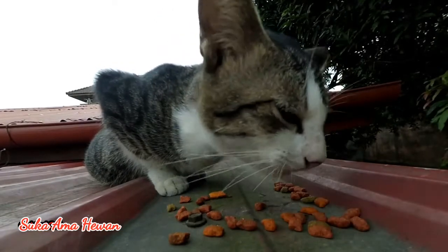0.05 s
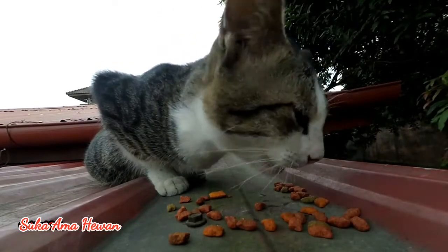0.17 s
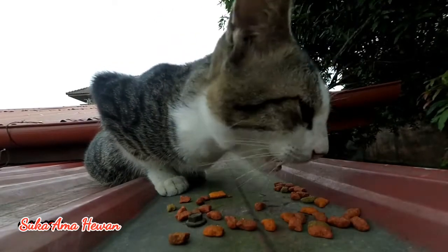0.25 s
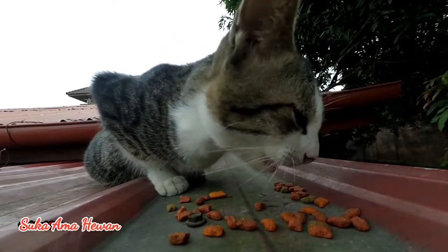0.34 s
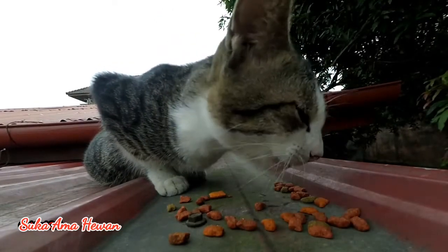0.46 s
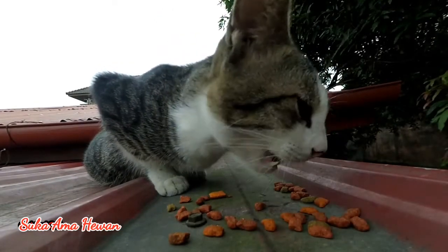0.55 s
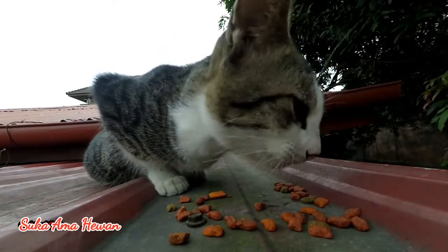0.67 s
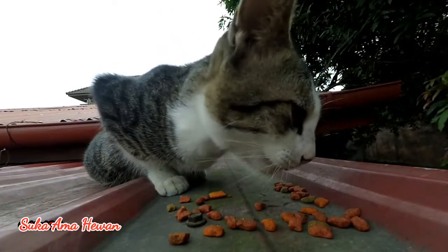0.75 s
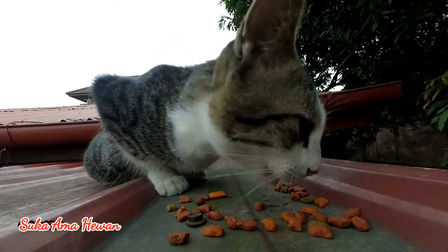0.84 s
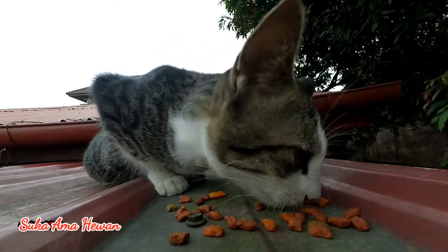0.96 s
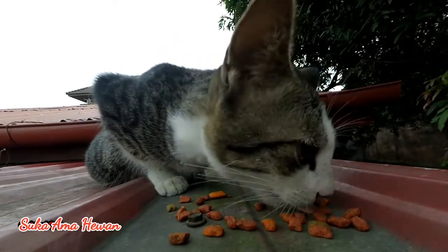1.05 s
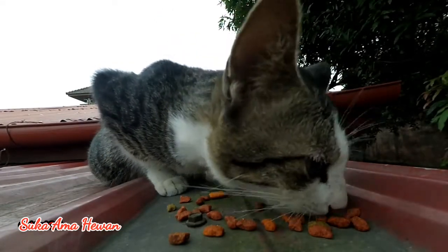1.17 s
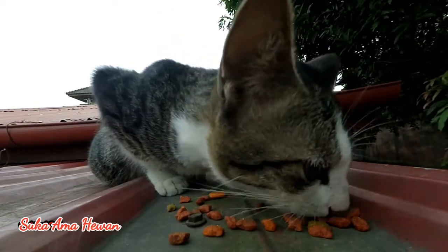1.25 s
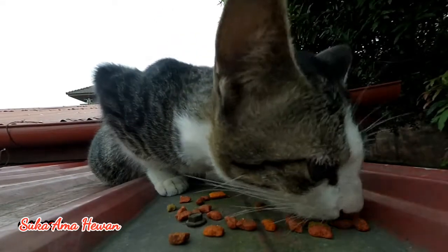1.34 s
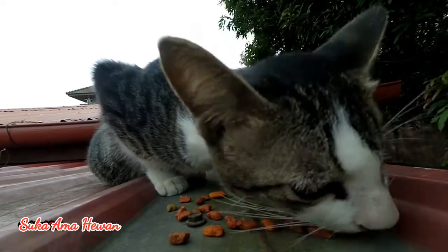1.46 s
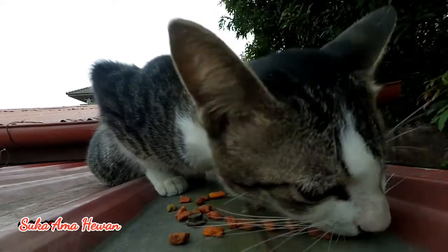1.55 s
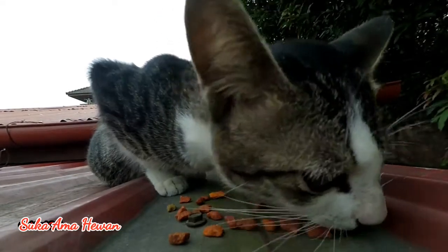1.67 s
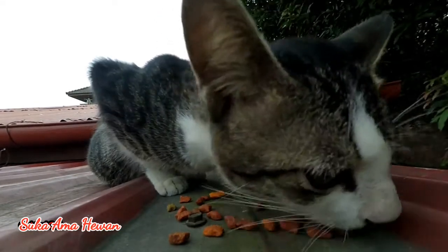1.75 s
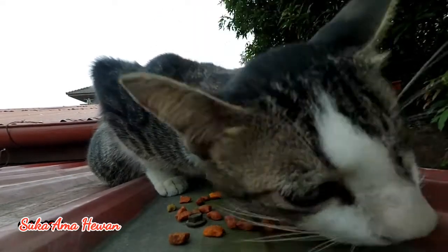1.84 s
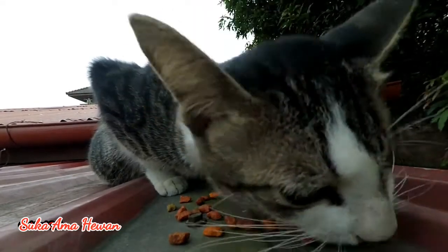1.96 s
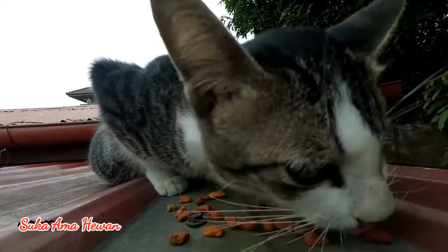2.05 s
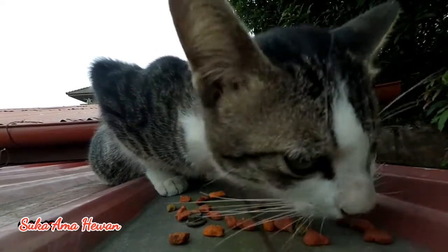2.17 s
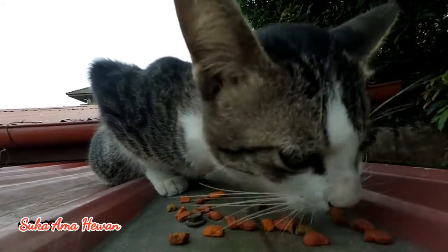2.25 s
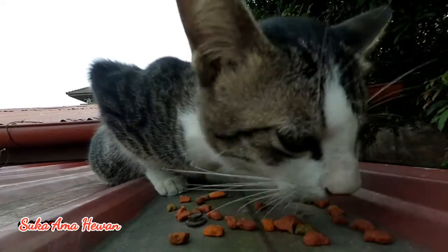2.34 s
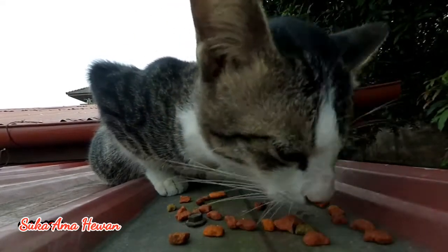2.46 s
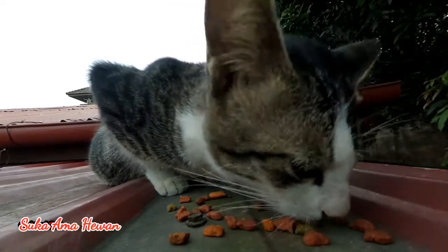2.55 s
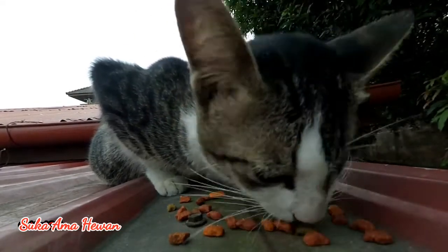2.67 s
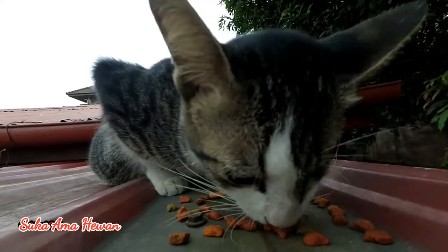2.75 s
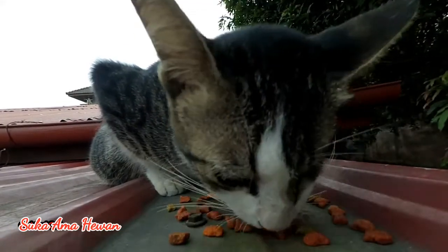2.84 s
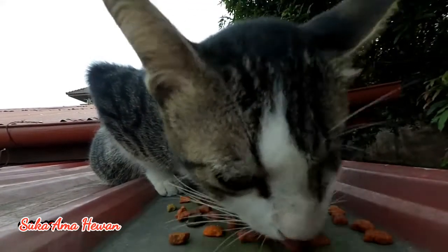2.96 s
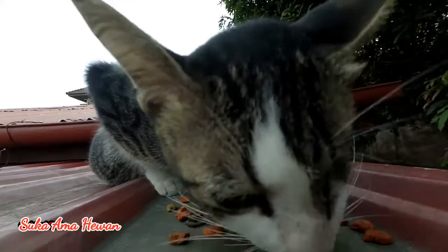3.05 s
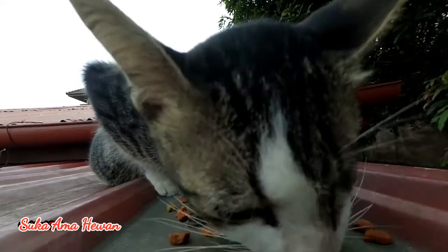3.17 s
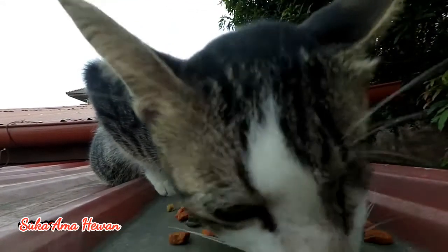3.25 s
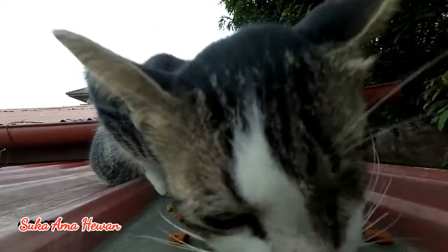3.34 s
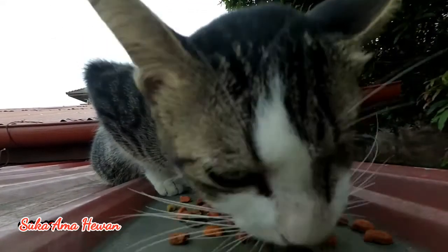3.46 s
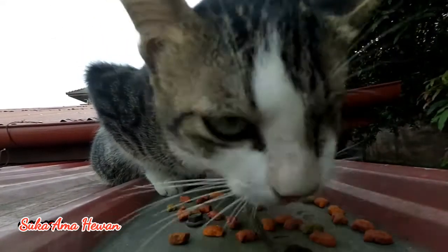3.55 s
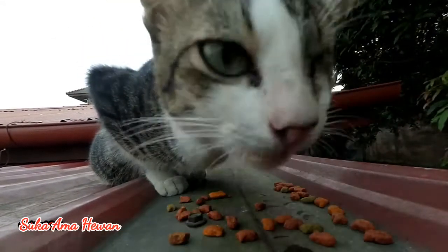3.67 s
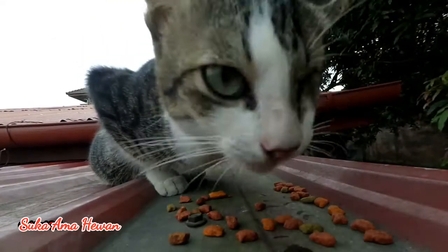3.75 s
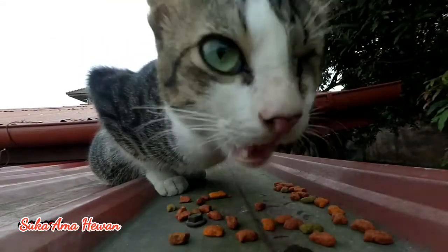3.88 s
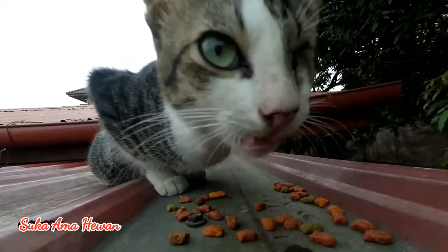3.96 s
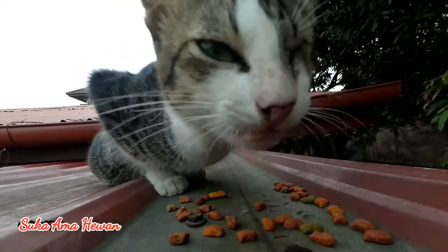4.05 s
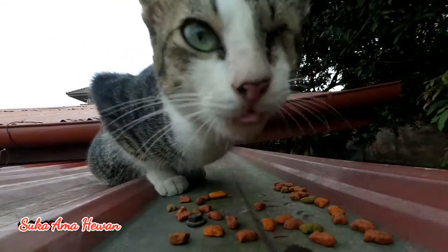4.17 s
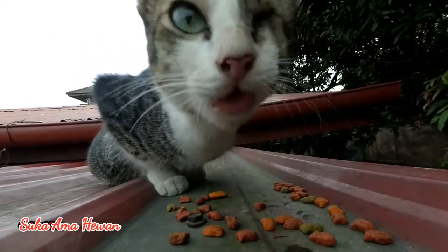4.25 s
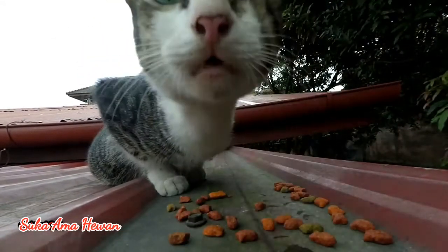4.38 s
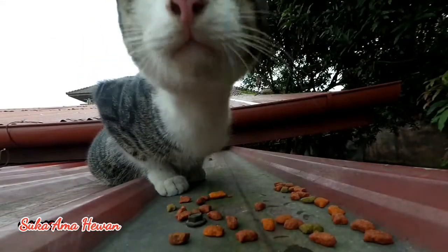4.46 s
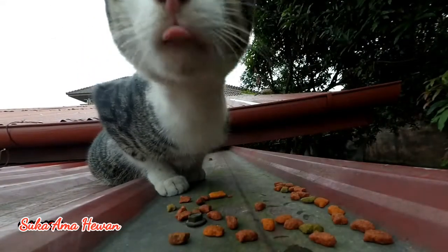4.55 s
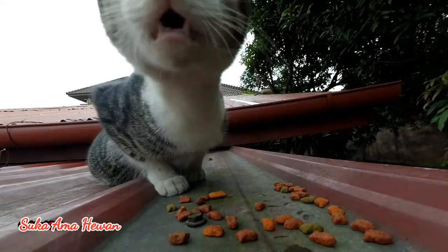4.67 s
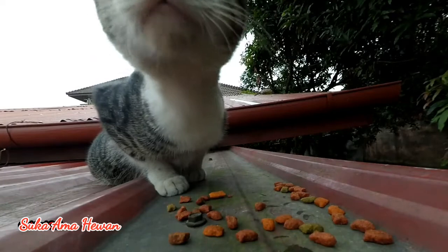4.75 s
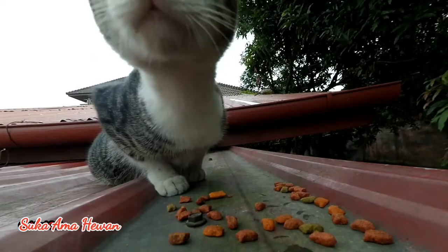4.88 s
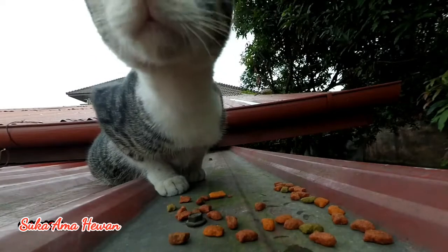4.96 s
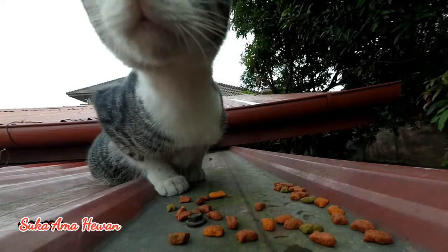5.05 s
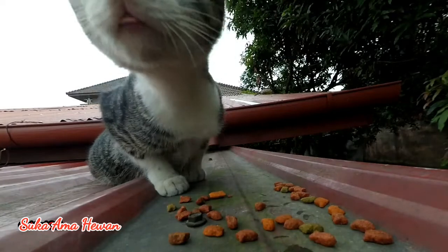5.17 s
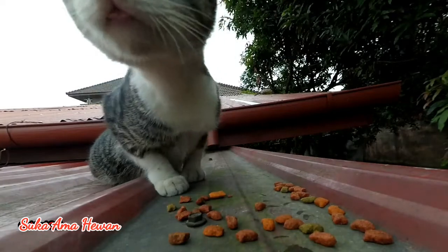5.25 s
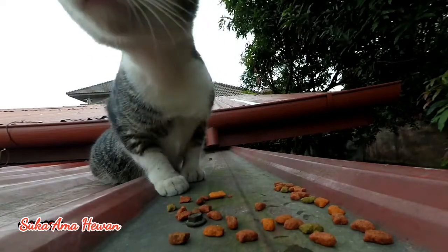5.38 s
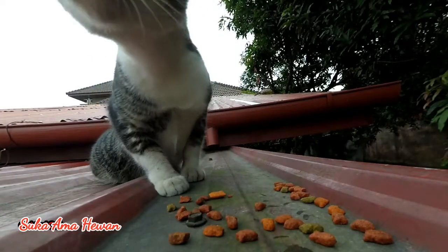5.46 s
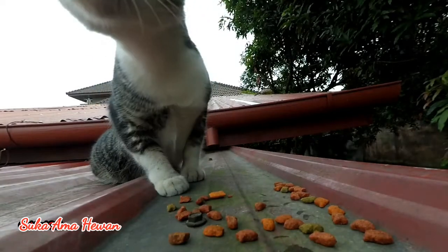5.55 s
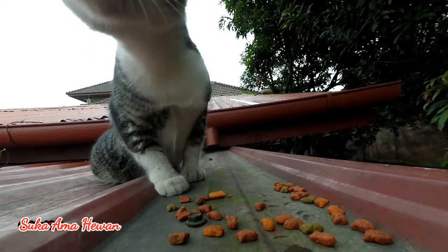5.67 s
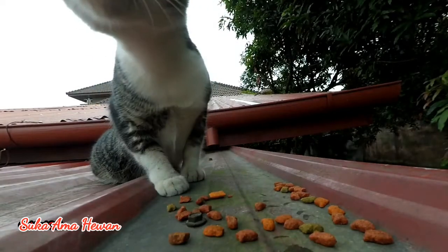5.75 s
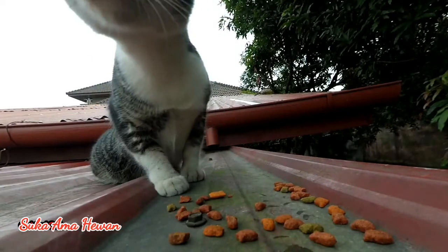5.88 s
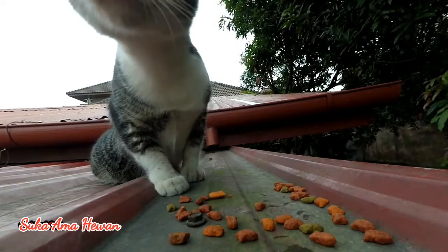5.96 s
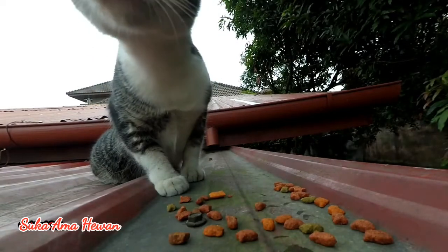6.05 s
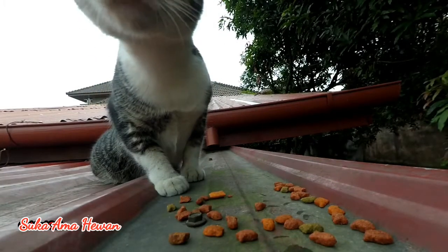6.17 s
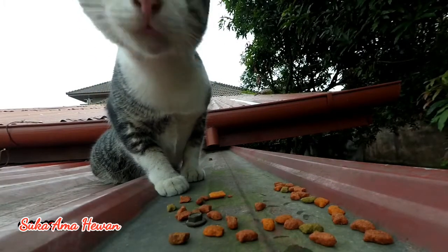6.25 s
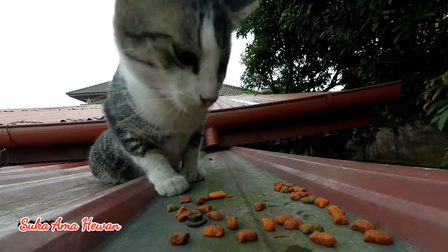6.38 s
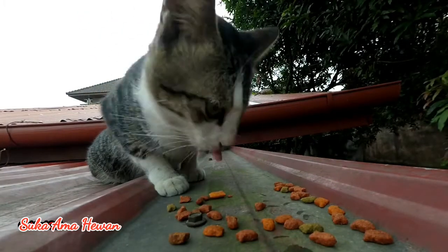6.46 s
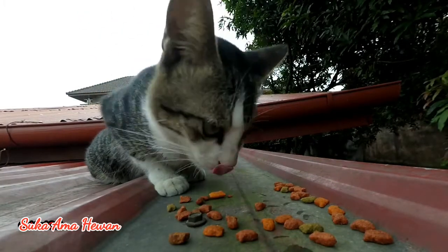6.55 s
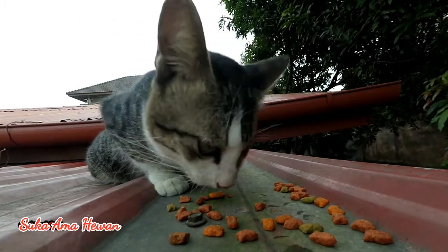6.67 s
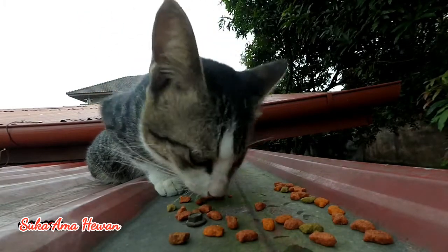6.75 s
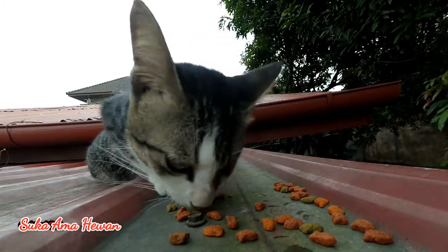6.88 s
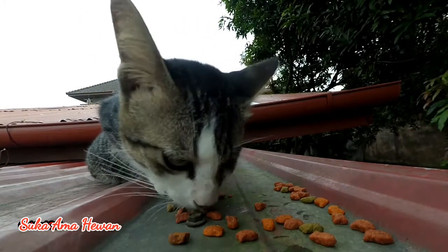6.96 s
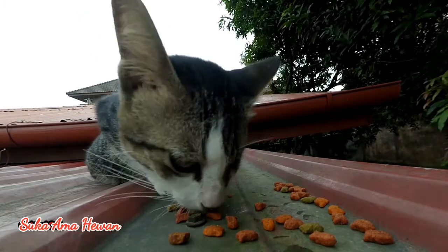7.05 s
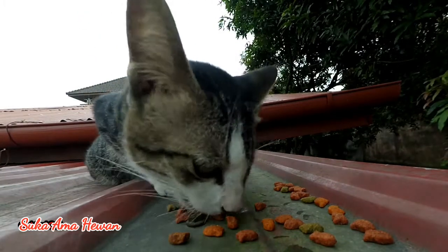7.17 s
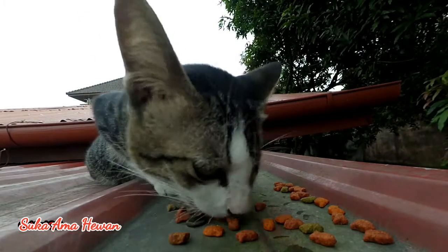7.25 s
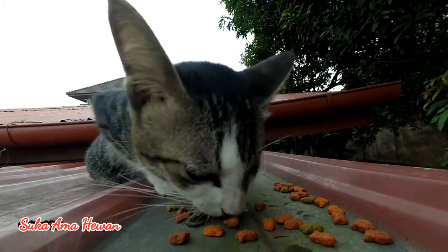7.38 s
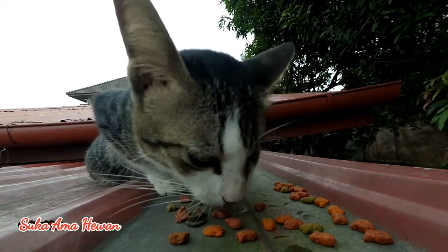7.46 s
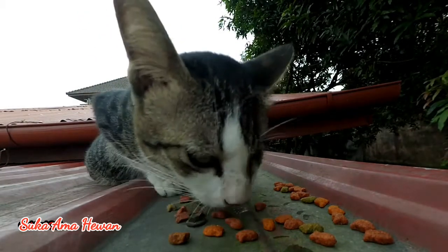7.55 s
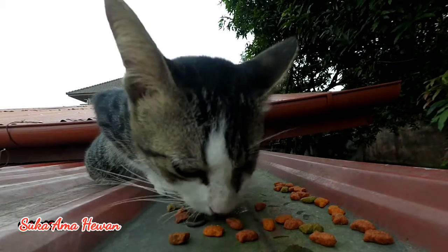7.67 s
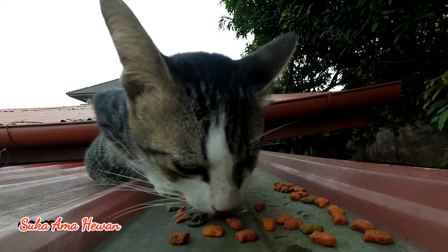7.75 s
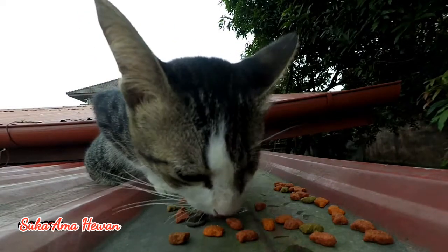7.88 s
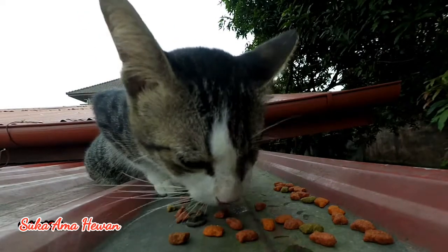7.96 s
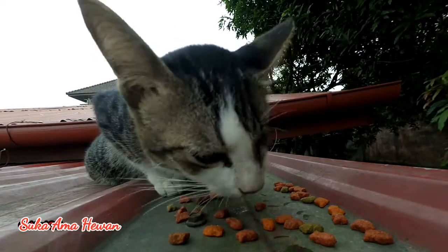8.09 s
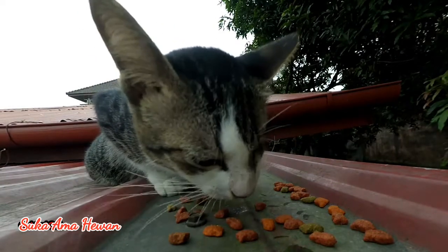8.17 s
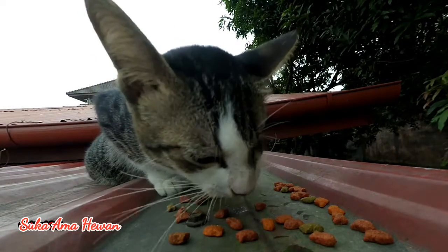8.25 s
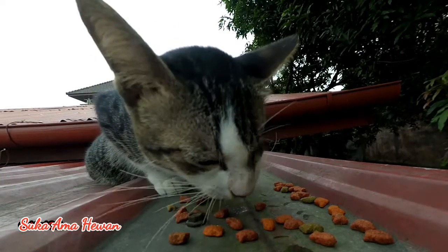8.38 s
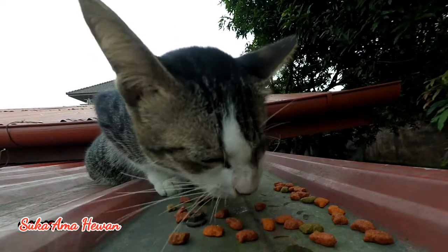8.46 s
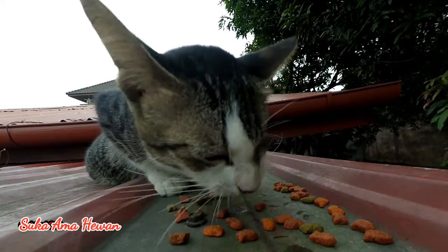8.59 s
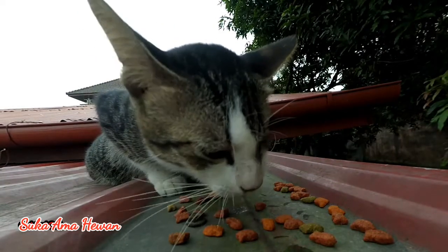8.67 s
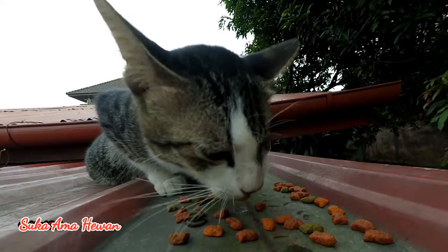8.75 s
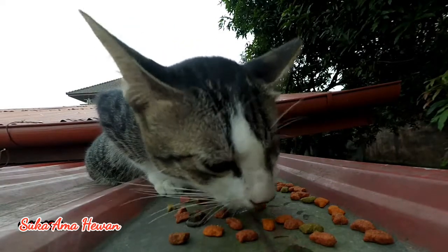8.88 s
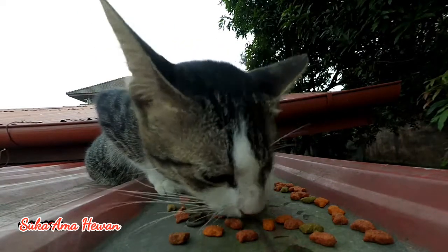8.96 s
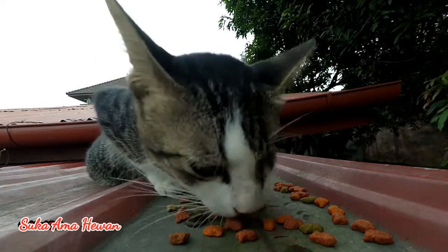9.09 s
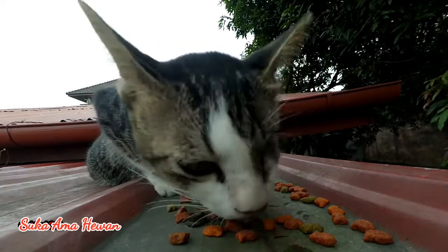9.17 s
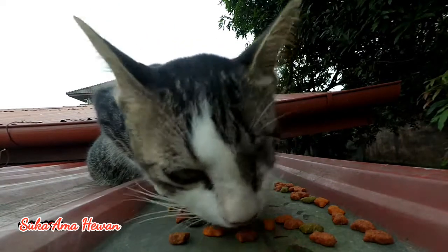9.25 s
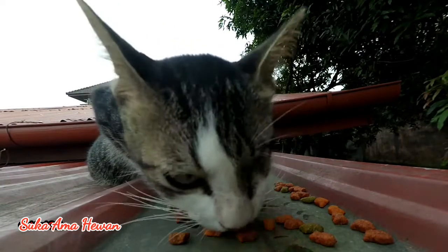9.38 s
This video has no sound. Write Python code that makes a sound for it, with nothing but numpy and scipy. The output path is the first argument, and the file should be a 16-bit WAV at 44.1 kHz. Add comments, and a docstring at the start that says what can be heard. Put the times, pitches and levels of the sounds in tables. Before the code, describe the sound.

A cat eats dry food on a metal roof, very close to the microphone, over a faint outdoor rumble and thin hiss. A few small wet lip smacks come at about 0.5 seconds. From 1.2 to 3.7 seconds, hard pellets click, knock and scrape on the sheet in an uneven bout, with soft low muzzle bumps and brittle cracks, loudest around 2 seconds. Two distant engines hum faintly between about 2 and 6 seconds. The eating pauses, leaving quiet licks and a smack from 4 to 4.5 seconds, and a slight whisker rustle near 6.5. A second, shorter bout of knocking and crunching runs from 7.2 to 8.1 seconds, with a sharp crack near 7.6. Wet smacks follow from 8.3 to 8.7 seconds, and two last pellet clicks land at about 9.3.

```python
"""Cat eating kibble on a metal roof

Pellets knock, scrape and crack as the teeth grab them, beside a microphone resting on the sheet.
Each knock arrives as a short falling bending wave; the muzzle bumps and sways the metal.
Between bouts come wet smacks and licks, over outdoor rumble, two far engines and a faint hiss."""
import sys
import numpy as np
from scipy import signal
from scipy.fft import rfft, irfft, next_fast_len
from scipy.io import wavfile
from scipy.ndimage import map_coordinates

SR = 44100
rng = np.random.default_rng(int(sys.argv[2]) if len(sys.argv) > 2 else 0)


def int16_out(signal):
    """Quantize to a 16-bit WAV file."""
    q = np.round(np.clip(np.atleast_2d(signal).T, -1, 1) * 32767)
    wavfile.write(sys.argv[1], SR, q.astype(np.int16))


N = 415422
TIME_S = np.arange(N) / SR
BLOW_SAMPLES = 2 ** 13
AGE_S, BLOW_HZ = np.arange(BLOW_SAMPLES) / SR, np.fft.rfftfreq(BLOW_SAMPLES, 1 / SR)
TURN_S = 5.0  # the cat turns from the near spot to the far one


def amp(db):
    """Decibels to gain."""
    return 10 ** (np.asarray(db) / 20)


def unit_rms(x):
    """Scale to rms 1."""
    return x / np.sqrt(np.mean(x ** 2) + 1e-20)


def unit_peak(x):
    """Scale to peak 1."""
    return x / np.abs(x).max()


def unit_energy(x):
    """Scale to energy 1."""
    return x / np.linalg.norm(x)


def log_interp(points, hz):
    """Read (Hz, value) points on a log axis."""
    point_hz, values = np.transpose(points)
    return np.interp(np.log(hz + 1), np.log(point_hz + 1), values)


def wobble(rate_hz):
    """Smooth random curve, rate_hz knots a second."""
    knots = rng.standard_normal(int(N * rate_hz / SR) + 4)
    return map_coordinates(knots, [np.arange(N) * rate_hz / SR])


def filtered(x, response):
    """Apply a gain given as a function of Hz."""
    size = next_fast_len(N + SR // 2)
    return irfft(rfft(x, size) * response(np.fft.rfftfreq(size, 1 / SR)), size)[:N]


def noise(spectrum):
    """Noise of rms 1, coloured by (Hz, dB) points."""
    return unit_rms(filtered(rng.standard_normal(N), lambda hz: amp(log_interp(spectrum, hz))))


def gliding_noise(hz, width_hz):
    """Noise of rms 1 in a resonance that follows the curve hz."""
    pole = np.exp(-np.pi * width_hz / SR)
    drift = signal.sosfilt([[1, 0, 0, 1, -2 * pole, pole ** 2]], rng.standard_normal((2, len(hz))))
    phase = 2 * np.pi * np.cumsum(hz) / SR
    return unit_rms(drift[0] * np.cos(phase) + drift[1] * np.sin(phase))


def resonances(modes):
    """Causal response of (Hz, width Hz, dB) modes, alternating in sign."""
    return sum((-1) ** k * amp(db) * 1j * BLOW_HZ * width / (hz ** 2 - BLOW_HZ ** 2 + 1j * BLOW_HZ * width)
               for k, (hz, width, db) in enumerate(modes))


def grains(rate_hz, spread_db):
    """Impulses of random time, sign and size."""
    impulses = (rng.random(N) < rate_hz / SR) * rng.choice([-1, 1], N)
    return impulses * amp(spread_db * rng.standard_normal(N).clip(-2, 2))


def arch(length_s):
    """Half-sine envelope."""
    return np.sin(np.linspace(0, np.pi, round(length_s * SR)))


def excerpt(track, start_s):
    """One blow's length of a track."""
    return track.take(round(start_s * SR) + np.arange(BLOW_SAMPLES), mode="wrap")


def add(track, start_s, sound):
    """Mix a sound into a track."""
    start = max(round(start_s * SR), 0)
    span = track[start:start + len(sound)]
    span += sound[:len(span)]


# Pellets striking the sheet. Each row: start in seconds, relative level in dB, favoured pitch in Hz.
PELLET_KNOCKS = [(1.281, -23.5, 1440), (1.3623, -23.5, 1210), (1.478, -25.5, 1260), (1.585, -19, 3030),
                 (1.631, -25.5, 1230), (1.6923, -18.5, 2500), (1.7367, -12.5, 2690), (1.8185, -12, 1400),
                 (1.8661, -23.5, 1440), (1.994, -11.5, 3100), (2.0124, -12, 2700), (2.0355, -17, 3460),
                 (2.0595, -20, 1600), (2.083, -30, 1560), (2.1961, -27, 2620), (2.2221, -26, 2430),
                 (2.2543, -23.5, 2500), (2.273, -24, 2430), (2.806, -25.5, 1140), (2.829, -31, 1590),
                 (2.9883, -31.5, 2300), (3.094, -15, 1920), (3.1138, -30, 1660), (3.141, -26.5, 1530),
                 (3.2293, -17, 2460), (3.2418, -26, 2500), (3.3032, -26.5, 2300), (3.4481, -26.5, 2540),
                 (3.5529, -22, 1360), (3.688, -25.5, 2180), (7.2418, -31, 2480), (7.3246, -18.5, 2780),
                 (7.3409, -23.5, 2680), (7.415, -19, 1820), (7.4315, -25, 2080), (7.478, -21, 3200),
                 (7.501, -22.5, 2600), (7.5728, -23, 1870), (7.637, -12, 2530), (7.9341, -24, 2830),
                 (8.0084, -32.5, 2450), (8.0923, -13.5, 3130), (9.26, -22, 3020), (9.275, -24.5, 2560)]

def knocks(gain_db=15, slip_s=0.0017, crumble_s=0.0059, run_up_s=0.01, lead_s=0.00076):
    """Pellets, settling fragments and flicked crumbs slip, strike and crumble within milliseconds."""
    fragments = [(s + 0.012 * (0.5 + rng.random()), db - 14, hz) for s, db, hz in PELLET_KNOCKS]
    crumbs = [(s, db, 1900) for s, db in nudges(gain_db=8, scatter_db=4.5)]
    since_strike_s = AGE_S - run_up_s
    grit_envelope = np.exp(-np.maximum(since_strike_s / crumble_s, -since_strike_s / slip_s))
    strike = np.exp(-2j * np.pi * BLOW_HZ * run_up_s)
    out = np.zeros(N)
    for start_s, db, pitch_hz in list(PELLET_KNOCKS) + fragments + crumbs:
        grit = rng.standard_normal(BLOW_SAMPLES) * grit_envelope
        force = strike + 0.72 * rfft(unit_energy(grit))
        # harder contacts are shorter, so brighter
        slope = 0.51 * np.log(pitch_hz / 2400)
        hardness = (BLOW_HZ.clip(1300, 10000) / 2400) ** slope
        octaves = np.log2((BLOW_HZ + 1) / pitch_hz)
        emphasis = amp(5 * np.exp(-(octaves / 0.67) ** 2))
        wave = irfft(force * hardness * emphasis * sheet_colour(start_s) * sheet_path())
        add(out, start_s - run_up_s - lead_s, amp(db + gain_db) * unit_energy(wave))
    return out


# Sheet resonances. Each row: centre in Hz, width in Hz, gain in dB at the near spot, at the far spot.
SHEET_MODES = [(422, 51, -1, -7), (557, 1000, -18.5, -22.5), (1037, 23, -5.5, -16), (1240, 103, -4.5, -9.5),
               (1355, 75, -1, -4), (1582, 69, 0.5, -1.5), (2160, 265, -5, 3), (2538, 153, 2, 4.5),
               (2790, 180, -1, -1), (3423, 170, -4, 3), (3787, 290, -8, -5), (4626, 300, -12.5, -9),
               (5130, 98, -15, -3.5), (5980, 2700, -24.5, -18.5), (9040, 240, -26.5, -19)]
# Bands blocked by the ribs. Each row: centre in Hz, width in Hz, depth from 0 to 1.
RIB_STOPBANDS = [(850, 120, 0.76), (1083, 29, 0.4), (1780, 350, 0.47), (2290, 105, 0.75), (3050, 134, 0.55),
                 (4600, 110, 0.8)]
# Pellet contact force. Each row: frequency in Hz, level in dB.
CONTACT_SPECTRUM = [(60, -2), (400, 4.5), (1200, 7), (5000, -1), (9000, -2), (15000, -7.5)]

def sheet_colour(time_s, scatter_db=2.8, detune=0.008):
    """Each spot stirs the sheet's modes differently, and no two pellets lie alike."""
    modes = [(hz * (1 + detune * rng.standard_normal()), width_hz,
              (near_db if time_s < TURN_S else far_db) + scatter_db * rng.standard_normal())
             for hz, width_hz, near_db, far_db in SHEET_MODES]
    notches = [1 - depth * resonances([(hz, width_hz, 0)]) for hz, width_hz, depth in RIB_STOPBANDS]
    return resonances(modes) * np.prod(notches, axis=0) * amp(log_interp(CONTACT_SPECTRUM, BLOW_HZ))


# Decay of the sheet's echoes. Each row: frequency in Hz, T60 in seconds.
SHEET_T60 = [(400, 1), (1400, 0.18), (3000, 0.16), (12000, 0.11)]

def sheet_path(echo_db=-11, echo_rise_s=0.0018):
    """The direct bending wave, then its echoes from ribs and edges."""
    # speed goes as the root of frequency, so treble arrives first
    delay_at_1khz_s = 0.004 * rng.uniform(0.4735, 1)
    direct = np.exp(-4j * np.pi * delay_at_1khz_s * np.sqrt(BLOW_HZ * 1000))
    hz, frame_s, frames = signal.stft(rng.standard_normal(BLOW_SAMPLES), SR, nperseg=128)
    decay = amp(-60 * frame_s / log_interp(SHEET_T60, hz)[:, None])
    echoes = signal.istft(frames * decay, SR, nperseg=128)[1][:BLOW_SAMPLES]
    echoes *= (1 - np.exp(-AGE_S / echo_rise_s)) ** 2
    return direct * (1 + amp(echo_db) * rfft(unit_energy(echoes)))


# Muzzle effort, one curve per bout of eating. Each row: time in seconds, effort in dB.
BOUT_EFFORT = [
    [(1.19, -62), (1.712, -50.5), (1.8, -46), (1.96, -68)],
    [(2.0, -47), (2.146, -40), (2.354, -52.5), (2.45, -64)],
    [(2.75, -58), (2.836, -43.5), (2.948, -56), (3.442, -51.5), (3.732, -63), (3.8, -68)],
    [(7.33, -51.5), (7.72, -57)],
]

def nudges(gain_db, scatter_db, interval_s=0.06):
    """Uneven nudges of lips and teeth, following the effort, as (seconds, dB) rows."""
    rows = []
    for bout in BOUT_EFFORT:
        times_s, effort_db = np.transpose(bout)
        beats_s = np.arange(times_s[0], times_s[-1], interval_s)
        starts_s = beats_s + interval_s * rng.random(len(beats_s))
        levels_db = np.interp(starts_s, times_s, effort_db) + gain_db
        rows += zip(starts_s, levels_db + scatter_db * rng.standard_normal(len(beats_s)))
    return rows


# Pellets splitting between the teeth. Each row: start in seconds, peak in dB.
PELLET_CRACKS = [(1.587, -23.5), (1.994, -14), (2.016, -22), (7.4757, -28), (7.637, -21.5), (8.092, -32.5)]
# Fracture colour. Each row: frequency in Hz, relative density in dB.
FRACTURE_SPECTRUM = [(1500, 2), (3400, 14), (5000, 11), (8500, -10), (15000, -27)]

def cracks(split_s=0.0021, splinter_s=0.012, splinter_db=-16):
    """A brittle pellet splits in a burst of tiny fractures, then splinters; heard through the air."""
    out = np.zeros(N)
    breaks = grains(rate_hz=4000, spread_db=6)
    fractures = filtered(breaks, lambda hz: amp(log_interp(FRACTURE_SPECTRUM, hz)))
    fade = np.exp(-AGE_S / split_s) + amp(splinter_db) * np.exp(-AGE_S / splinter_s)
    for start_s, db in PELLET_CRACKS:
        add(out, start_s, amp(db) * unit_peak(fade * excerpt(fractures, start_s)))
    return out


# Pellets dragged on the sheet. Each row: start in seconds, length in seconds, relative level in dB.
PELLET_DRAGS = [(1.198, 0.049, -39), (1.415, 0.071, -40), (1.669, 0.092, -35), (2.012, 0.1, -33),
                (3.383, 0.12, -36), (7.037, 0.053, -45.5), (9.072, 0.052, -54.5)]

def scrapes(gain_db=-1, catch_db=3.5, shuffle_s=0.079, cutoff_hz=9000):
    """Dragged and nudged pellets catch and slip in a gritty swell that rings the sheet."""
    out = np.zeros(N)
    slips = unit_rms(grains(rate_hz=1300, spread_db=2.5) * amp(catch_db * wobble(110)))
    shuffles = [(s - shuffle_s / 2, shuffle_s, db) for s, db in nudges(gain_db=0.5, scatter_db=1.5)]
    for start_s, length_s, db in list(PELLET_DRAGS) + shuffles:
        swell = np.sqrt(np.sin(np.pi * np.clip(AGE_S / length_s, 0, 1)))
        drag = swell * excerpt(slips, start_s)
        ring = irfft(sheet_colour(start_s) * sheet_path() / (1 + 1j * BLOW_HZ / cutoff_hz))
        add(out, start_s, amp(db + gain_db) * signal.fftconvolve(drag, unit_energy(ring)))
    return out


# Muzzle bumps on the sheet. Each row: start in seconds, relative peak in dB.
MUZZLE_BUMPS = [(1.599, -24.5), (1.629, -23.5), (1.692, -24.5), (1.816, -23), (2.026, -24), (3.427, -32.5)]
# Sheet modes under a soft push. Each row: centre in Hz, width in Hz, gain in dB.
PUSH_MODES = [(232, 153, -8.5), (405, 145, -2)]

def bumps(gain_db=-4, push_s=0.02, cutoff_hz=600):
    """The soft muzzle moves only the sheet's low modes."""
    out = np.zeros(N)
    for start_s, db in MUZZLE_BUMPS:
        push = rng.standard_normal(BLOW_SAMPLES) * np.exp(-AGE_S / push_s)
        thud = irfft(rfft(push) * resonances(PUSH_MODES) / (1 + (BLOW_HZ / cutoff_hz) ** 4))
        add(out, start_s, amp(db + gain_db) * unit_peak(thud))
    return out


def rocking(sway_hz=36, width_hz=16, rub_db=-4, firm_db=-50, far_db=-14):
    """Leaning in, the cat sways the sheet at its lowest mode; its chin rubs out a low murmur."""
    bouts_db = [np.interp(TIME_S, *np.transpose(bout), left=-np.inf, right=-np.inf)
                for bout in BOUT_EFFORT]
    effort = amp(np.max(bouts_db, axis=0) - firm_db)
    weight = amp(firm_db + far_db * (TIME_S > TURN_S)) * effort ** 0.6
    sway_ring = irfft(resonances([(sway_hz, width_hz, 0)]) ** 2)
    rub_ring = irfft(resonances(PUSH_MODES) / (1 + 1j * BLOW_HZ / 700))
    sway = signal.oaconvolve(rng.standard_normal(N), sway_ring)[:N]
    rub = signal.oaconvolve(rng.standard_normal(N), rub_ring)[:N]
    return weight * (unit_rms(sway) + amp(rub_db) * unit_rms(rub))


# Tongue and lips parting. Each row: start in seconds, pop peak in dB, pop pitch in Hz,
# pop decay in seconds, relative jaw level in dB, spray peak in dB, spray resonance in Hz.
LIP_SMACKS = [(.478, -37, 1830, 0.002, -44.5, -35.5, 7800), (0.5476, -38, 1760, 0.0027, -51, -36.5, 8200),
              (0.5945, -34, 1680, 0.0013, -42.5, -32.5, 8500), (4.184, -52, 2390, .0007, -36, -34, 7100),
              (8.3298, -34, 2060, 0.0032, -45, -38, 7700), (8.3656, -32, 1970, 0.0011, -44, -43, 3800),
              (8.574, -31.5, 1800, 0.0025, -38, -29.5, 4360), (8.7326, -48, 1680, 0.0011, -37.5, -35, 4400)]
# Bursting saliva. Each row: frequency in Hz, relative density in dB.
SPRAY_SPECTRUM = [(600, -13), (2000, 5), (5500, 1.5), (15000, -21.5)]

def smacks(pop_rise_s=0.0006, spray_rise_s=0.00034, spray_decay_s=0.0018, jaw_hz=440, jaw_t60_s=0.035):
    """A saliva film breaks: a round pop, a spray that stirs a mouth resonance, a thud of the jaw."""
    out = np.zeros(N)
    spray_envelope = (1 - np.exp(-AGE_S / spray_rise_s)) * np.exp(-AGE_S / spray_decay_s)
    jaw = np.sin(2 * np.pi * jaw_hz * AGE_S) * amp(4 - 60 * AGE_S / jaw_t60_s)
    for start_s, pop_db, pop_hz, decay_s, jaw_db, spray_db, spray_hz in LIP_SMACKS:
        pop_envelope = (1 - np.exp(-AGE_S / pop_rise_s)) ** 2 * np.exp(-AGE_S / decay_s)
        pop = unit_peak(np.sin(2 * np.pi * pop_hz * AGE_S) * pop_envelope)
        burst = rng.standard_normal(BLOW_SAMPLES) * spray_envelope
        mouth = 1 + resonances([(spray_hz, 450, 10)])
        spray = irfft(rfft(burst) * amp(log_interp(SPRAY_SPECTRUM, BLOW_HZ)) * mouth)
        spray *= AGE_S < AGE_S[-1] / 2  # cut the FFT wrap-around
        add(out, start_s, amp(pop_db) * pop + amp(spray_db) * unit_peak(spray) + amp(jaw_db) * jaw)
    return out


# Wet licks. Each row: start in seconds, length in seconds, level in dB,
# mouth resonance in Hz at the start, at the end, upper resonance gain in dB.
LIP_LICKS = [(1.007, 0.029, -56.5, 2120, 2130, -11), (4.047, 0.15, -61, 2870, 1625, -23),
             (4.376, 0.16, -59.5, 2140, 2200, -12)]

def licks(width_hz=900, upper_ratio=2.15, flutter_db=3.5):
    """The tongue swishes over the lips, through two mouth resonances that glide with the jaw."""
    out = np.zeros(N)
    for start_s, length_s, db, start_hz, end_hz, upper_db in LIP_LICKS:
        swell = arch(length_s)
        mouth_hz = np.linspace(start_hz, end_hz, len(swell))
        lower = gliding_noise(mouth_hz, width_hz)
        upper = amp(upper_db) * gliding_noise(upper_ratio * mouth_hz, width_hz)
        add(out, start_s, amp(db) * swell * (lower + upper))
    return out * amp(flutter_db * wobble(120))


# Lip rustles. Each row: start in seconds, length in seconds, level in dB.
LIP_RUSTLES = [(0.128, 0.13, -62.5), (0.51, 0.011, -54), (4.188, 0.088, -63), (4.582, 0.01, -58.5),
               (6.573, 0.072, -63.5), (6.796, 0.24, -70)]
# Colour of rustles and ticks. Each row: frequency in Hz, relative density in dB.
TREBLE_SPECTRUM = [(1500, -11), (2700, 6.5), (4800, -12), (6200, 0.5), (7400, -11.5), (8600, -4),
                   (10000, -15), (15000, -69)]

def rustles(flutter_db=4):
    """Lips and whiskers rub in short, uneven strokes."""
    strokes = np.zeros(N)
    for start_s, length_s, db in LIP_RUSTLES:
        add(strokes, start_s, amp(db) * arch(length_s))
    return strokes * unit_rms(amp(flutter_db * wobble(110)) * noise(TREBLE_SPECTRUM))


def ticks(level_db=-73, life_s=0.0024):
    """Faint, high, random ticks run throughout."""
    impulses = np.abs(grains(rate_hz=70, spread_db=2))
    bursts = signal.oaconvolve(impulses, AGE_S * np.exp(-2 * AGE_S / life_s))[:N]
    return amp(level_db) * unit_rms(bursts * noise(TREBLE_SPECTRUM))


# Far engines. Each row: start and end in seconds, level in dB, start and end pitch in Hz.
FAR_ENGINES = [(2.1, 6.2, -57.5, 112, 110), (2.9, 4.8, -54, 128.7, 140.7)]

def engines(fade_s=0.4, waver_db=1.8, waver_hz=1.79):
    """Far engines hum in and out, wavering in pitch and level."""
    out = np.zeros(N)
    for start_s, end_s, db, start_hz, end_hz in FAR_ENGINES:
        fade = np.clip(np.minimum(TIME_S - start_s, end_s - TIME_S) / fade_s, 0, 1)
        gain = amp(db + waver_db * wobble(6))
        hz = np.interp(TIME_S, [start_s, end_s], [start_hz, end_hz]) + waver_hz * wobble(7.6)
        out += fade * gain * np.sin(2 * np.pi * np.cumsum(hz) / SR)
    return out


# Outdoor levels. Each row: time in seconds, then relative rumble, drone and hiss levels in dB.
OUTDOOR_LEVELS = [(0, -53.5, -57.5, -72), (2.23, -53.5, -50.5, -72), (5.3, -56.5, -57.5, -74),
                  (6.1, -55, -56.5, -76), (9.42, -57, -55.5, -72.5)]
# Colours of the three layers. Each row: frequency in Hz, relative density in dB.
RUMBLE_SPECTRUM = [(8, -0.5), (60, -1.5), (100, -5.5), (160, -24), (400, -87)]
DRONE_SPECTRUM = [(50, -31.5), (110, 8.5), (145, 5.5), (190, -0.5), (300, 0.5), (400, 2.5), (480, -4.5),
                  (600, -14.5), (900, -21), (2000, -56)]
HISS_SPECTRUM = [(400, -4), (900, 7.5), (4200, 2), (6300, -7), (8600, -6.5), (10000, -11)]

def outdoors():
    """Low rumble, the drone of far traffic and a thin, flickering hiss."""
    times_s, *levels_db = np.transpose(OUTDOOR_LEVELS)
    rumble_db, drone_db, hiss_db = [np.interp(TIME_S, times_s, db) for db in levels_db]
    rumble = amp(rumble_db + 3) * noise(RUMBLE_SPECTRUM)
    drone = amp(drone_db + 3 + 0.79 * wobble(8.3)) * noise(DRONE_SPECTRUM)
    hiss = amp(hiss_db + 6 + 0.8 * wobble(31)) * noise(HISS_SPECTRUM)
    return rumble + drone + hiss


def scene():
    """One microphone, alike in both channels."""
    eating = knocks() + cracks() + scrapes() + bumps() + rocking()
    mouth = smacks() + licks() + rustles()
    mono = eating + mouth + ticks() + outdoors() + engines()
    return np.array([mono, mono])


def record(dry):
    """Brick-wall low-pass at 15.3 kHz."""
    return np.array([filtered(channel, lambda hz: hz < 15300) for channel in dry])


dry = scene()
out = record(dry)
int16_out(out)
```